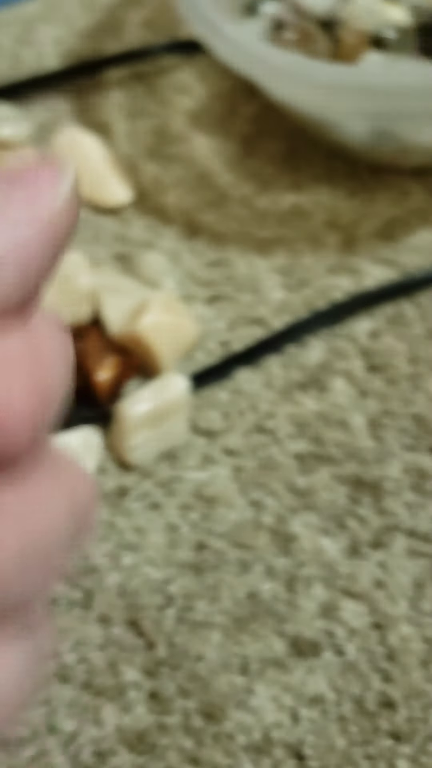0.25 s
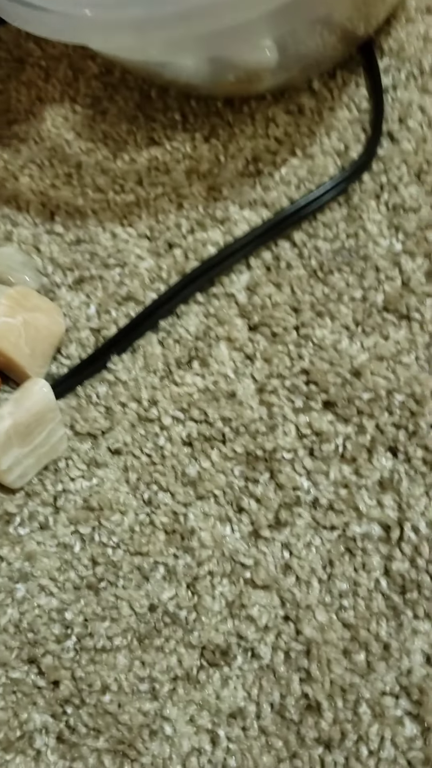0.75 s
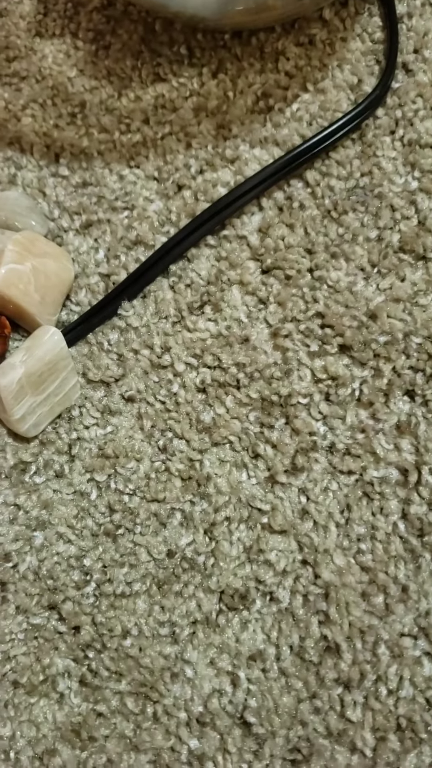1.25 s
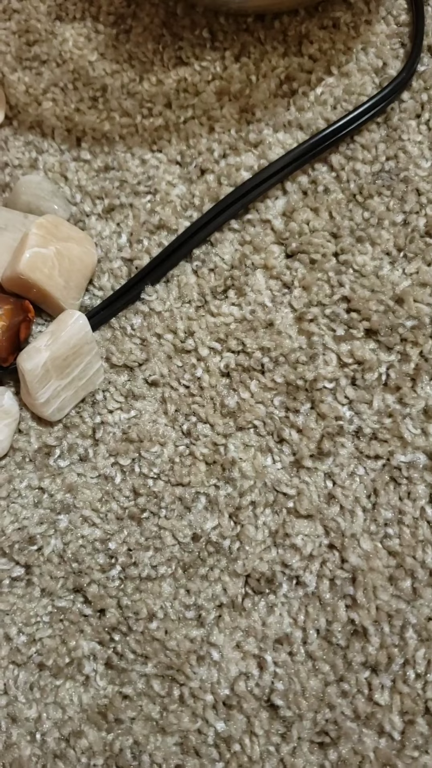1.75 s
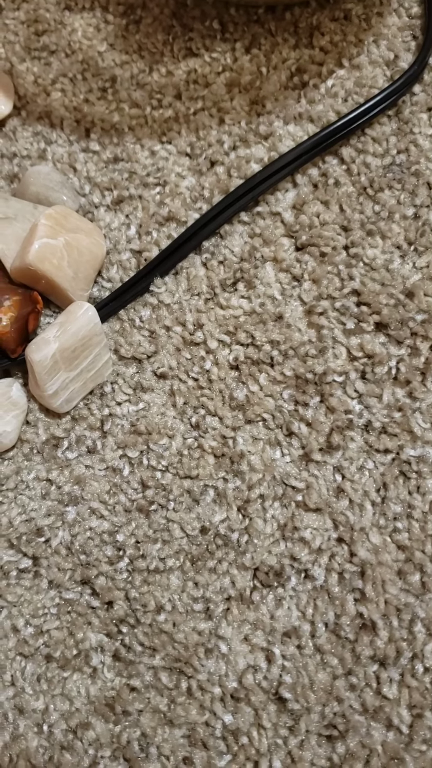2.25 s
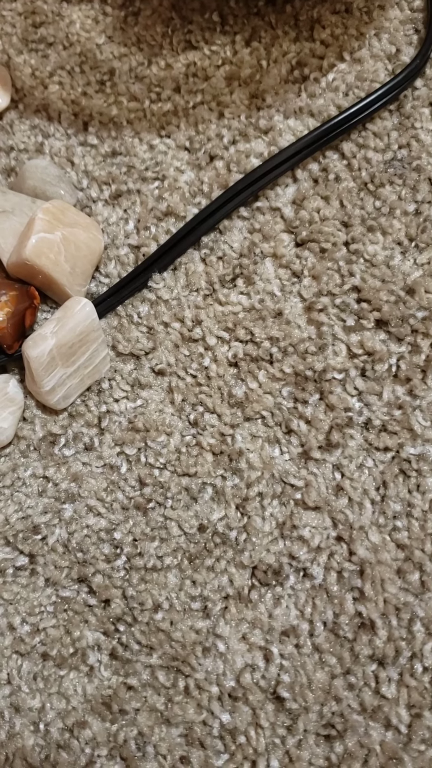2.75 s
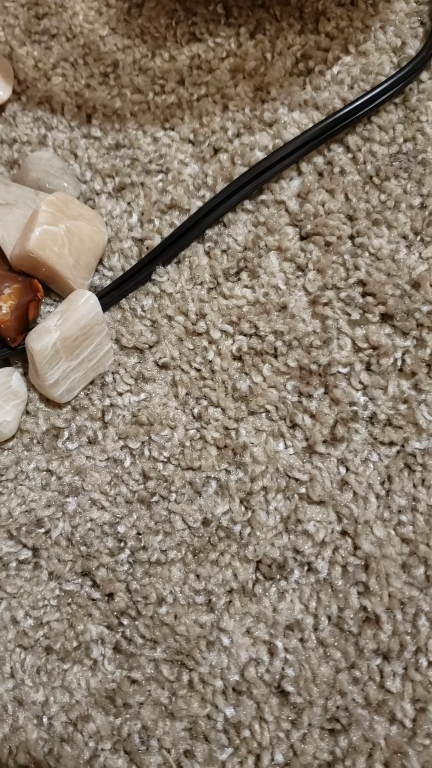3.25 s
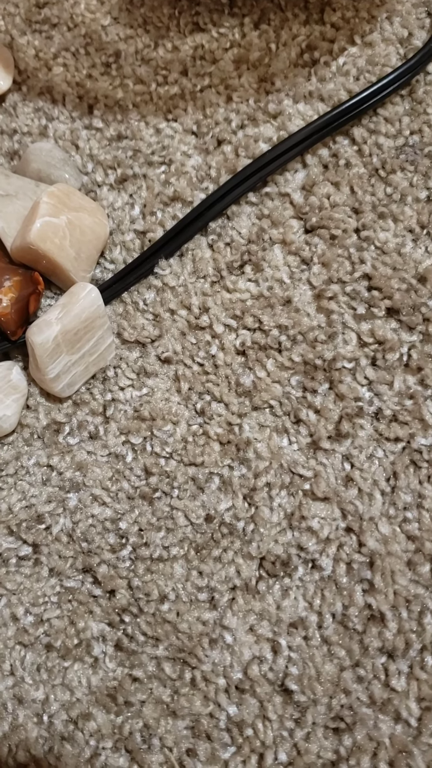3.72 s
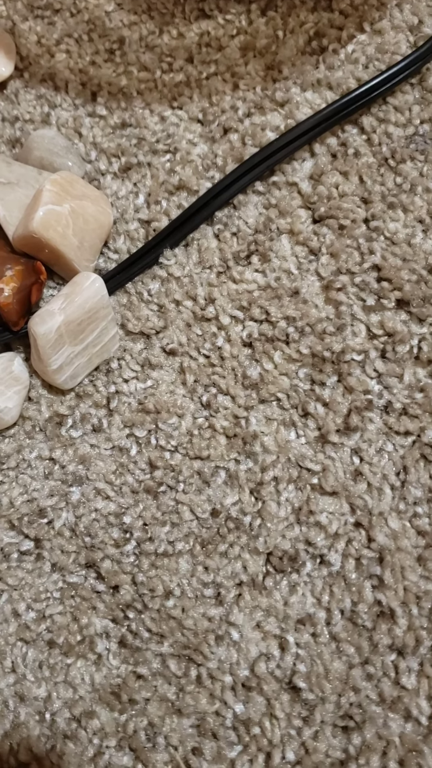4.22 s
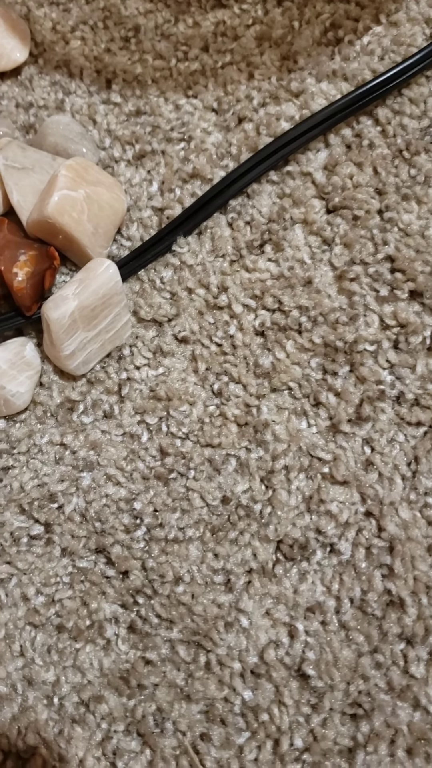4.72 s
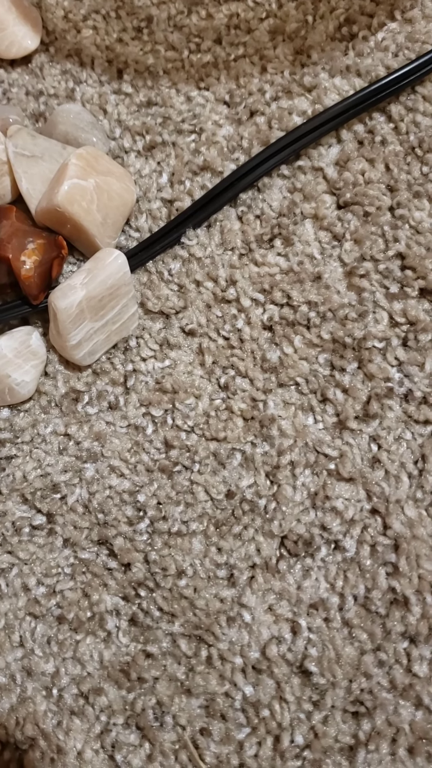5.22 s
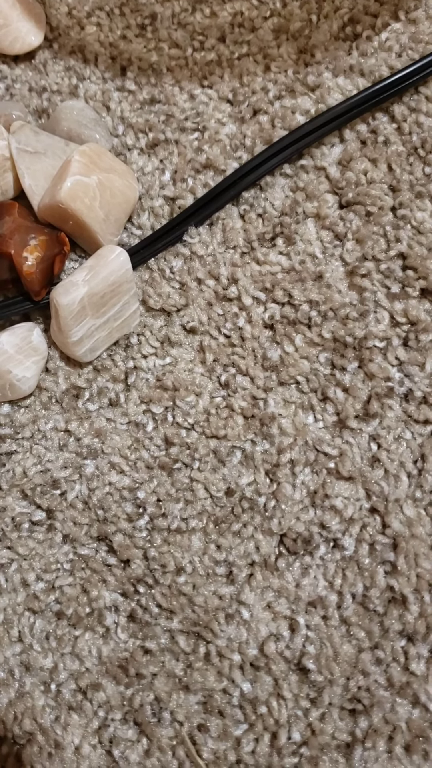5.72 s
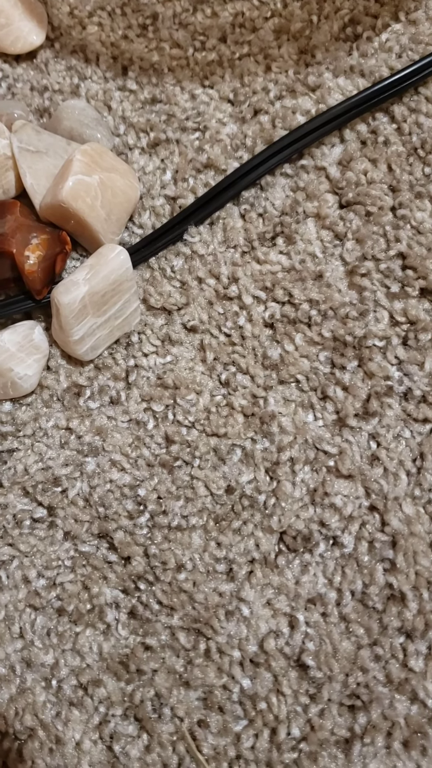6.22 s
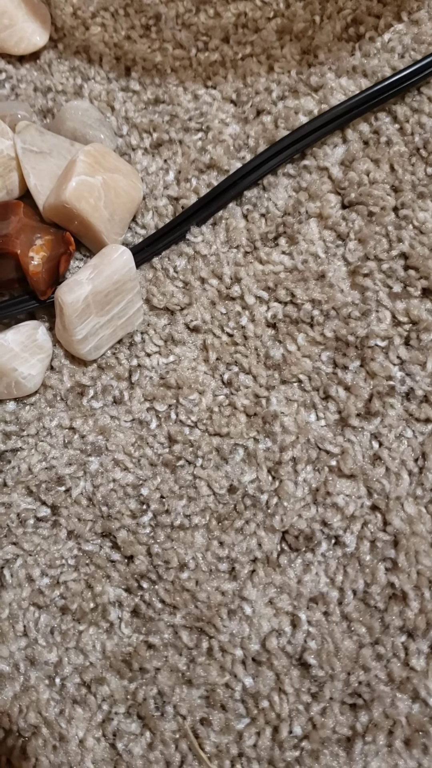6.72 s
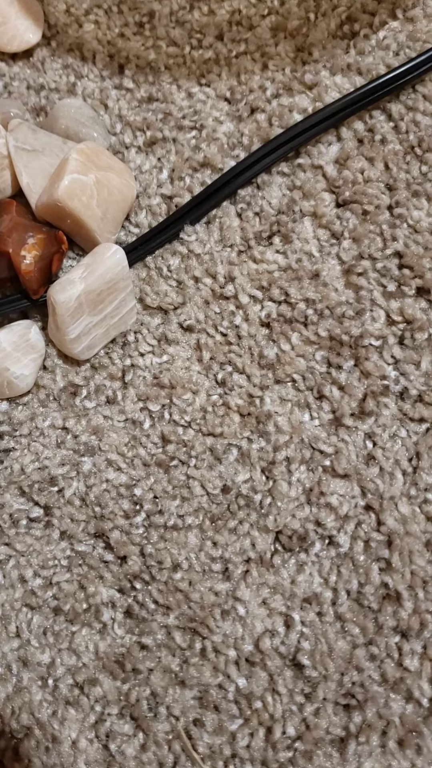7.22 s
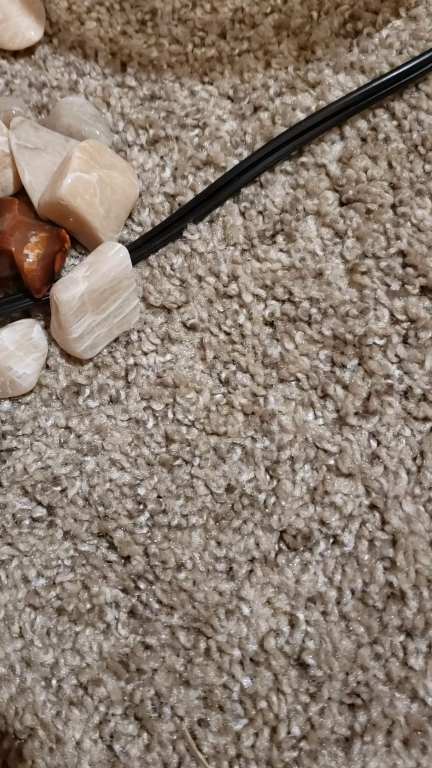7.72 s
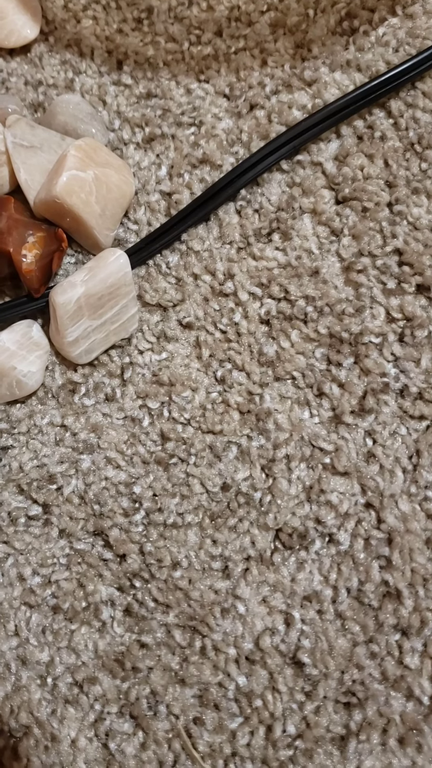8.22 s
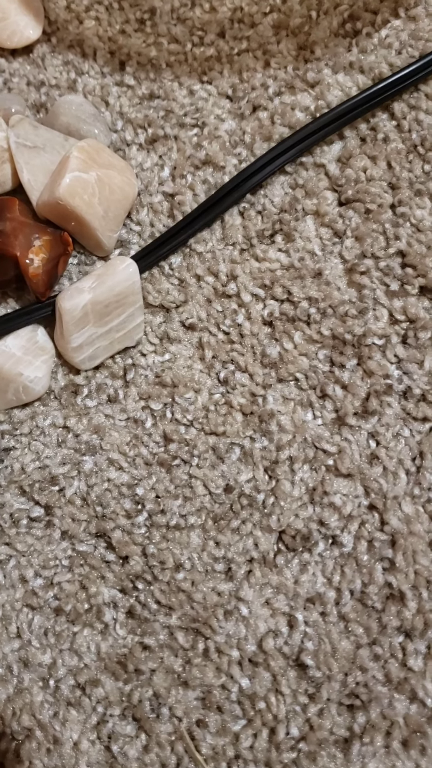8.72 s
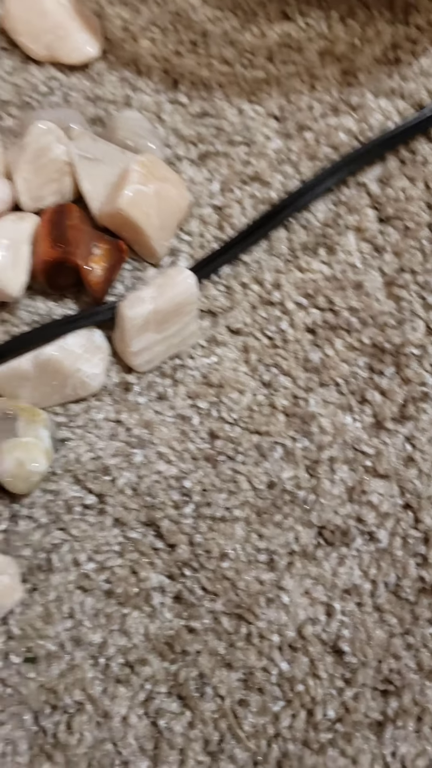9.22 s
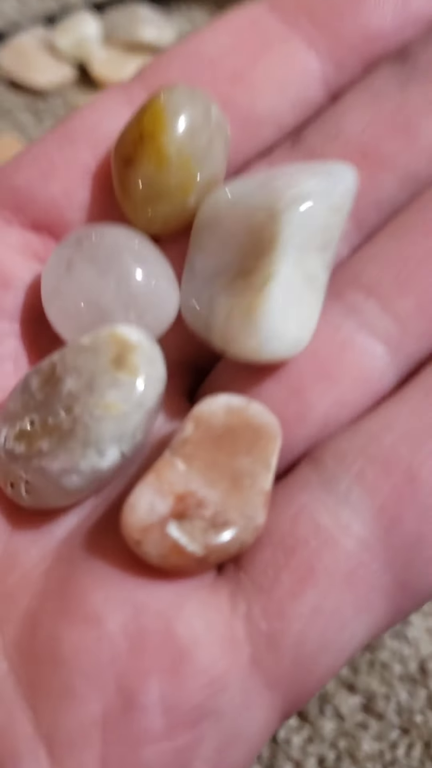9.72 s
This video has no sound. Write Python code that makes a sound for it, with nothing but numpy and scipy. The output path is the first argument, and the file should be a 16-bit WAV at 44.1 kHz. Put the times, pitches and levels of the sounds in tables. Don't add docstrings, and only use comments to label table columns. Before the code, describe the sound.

Close, dry stereo in a small carpeted room. Polished pebbles click in a hand, then pour into a plastic tub in a bright, dense rattle with hollow knocks. A few stragglers tick to rest, with one last tap on the tub. After quiet gaps come sharp clicks, small clattering bursts and very soft presses on carpet as stones are picked up and sorted. A faint, slowly swelling low hum and slight hiss lie underneath.

```python
import sys
import numpy as np
from scipy import signal
from scipy.fft import rfft, irfft
from scipy.io import wavfile
from scipy.ndimage import uniform_filter1d

SR = 44100
rng = np.random.default_rng(int(sys.argv[2]) if len(sys.argv) > 2 else 0)


def waveform_to_disk(signal):
    frames = np.transpose(np.atleast_2d(signal))
    scaled = np.clip(frames, -1, 1) * 32767
    samples = np.round(scaled).astype(np.int16)
    wavfile.write(sys.argv[1], SR, samples)


def ratio(d):
    e = np.asarray(d, float) / 20
    return 10 ** e


N = 439236


def evened(x):
    return x / np.sqrt(np.mean(x ** 2) + 1e-20)


def read(points, hz):
    f, value = np.transpose(points)
    return np.interp(np.log(hz + 1), np.log(f + 1), value)


def add(mix, s, sound):
    part = mix[round(s * SR):][:len(sound)]
    part += sound[:len(part)]


def drift(curve):
    return np.interp(np.arange(N) / SR, *np.transpose(curve))


def colour(x, db):
    hz, t, z = signal.stft(x, SR, nperseg=256)
    z = z * ratio(db(hz[:, None], t))
    return signal.istft(z, SR, nperseg=256)[1][..., :x.shape[-1]]


# pitch_hz, likeness (1 = the same)
LIKENESS = [(60, 0.86), (130, 0.57), (290, 0.94), (640, 0.37), (1400, 0.27), (3000, 0.017)]


def background(tone, patchy_db=2.5):
    frames, hz = N // 1024 + 5, np.fft.rfftfreq(4096, 1 / SR)
    a, b, c, d, patches = rng.standard_normal((frames, 2049, 5)).T
    patches = evened(uniform_filter1d(uniform_filter1d(patches, 6, 0), 4, 1))
    same = np.clip(read(LIKENESS, hz), -1, 1)[:, None]
    left, other = a + 1j * b, c + 1j * d
    z = np.array([left, same * left + np.sqrt(1 - same ** 2) * other])
    z *= ratio(read(tone, hz)[:, None] + patchy_db * patches)
    return evened(signal.istft(z, nperseg=4096, noverlap=3072)[1][:, :N])


# pitch_hz, density_db (per Hz)
HUM_TONE = [(18, -40), (30, -13.5), (48, -9), (64, 2), (87, -14), (118, 5), (133, -11.5), (151, -14),
            (199, -12.5), (243, -2.5), (265, -7.5), (285, -27), (314, -11), (345, -19), (380, -25),
            (490, -59.5), (840, -120)]
# time_s, level_db
HUM_LEVEL = [(0.0, -61), (1, -62.5), (1.41, -68.5), (3.1, -71.5), (4.05, -61), (5.1, -62.5), (5.6, -58),
             (6.46, -62), (8.5, -59.5), (9.96, -62)]


def hum():
    return ratio(drift(HUM_LEVEL)) * background(HUM_TONE)


# pitch_hz, density_db (per Hz)
HISS_TONE = [(220, -27), (380, -8), (546, -13), (726, -8.5), (785, -12), (1430, -17), (3700, -20.5),
             (5800, -24), (6700, -22), (7400, -28), (8800, -29.5), (12200, -18.5), (15850, -19.5),
             (16000, -46)]
# time_s, level_db
HISS_DRIFT = [(0, -79), (1.4, -86.5), (3.3, -91), (4.2, -84), (6.5, -85.5), (8.2, -82.5), (9.96, -84)]


def hiss():
    return ratio(drift(HISS_DRIFT) + 8.5) * background(HISS_TONE)


# pitch_hz, t60_s
SCATTER_T60 = [(300, 0.34), (1300, 0.21), (3500, 0.13), (9000, 0.047), (15000, 0.041)]
# delay_s, level_db
WALL_ECHOES = [
    (.0035, -15),
    (.0115, -19),
    (.019, -22.5),
]


def room(x, scatter_db=-10.5, late_db=-23, late_t60=0.28):
    t = np.arange(SR // 2) / SR
    taps = rng.standard_normal((2, 2, SR // 2)) * np.clip((t - .002) / 0.0014, 0, 1)
    early = colour(taps[0], lambda hz, t: -60 * t / read(SCATTER_T60, hz) - 5 * (t > .036))
    late = taps[1] * ratio(-60 * t / late_t60)
    tail = ratio(scatter_db) * early / np.linalg.norm(early[0])
    tail = tail + ratio(late_db) * late / np.linalg.norm(late[0])
    for s, db in WALL_ECHOES:
        for side in tail:
            add(side, s + 0.00059 * rng.random(), ratio(db) * rng.choice([-1., 1.], size=1))
    return signal.oaconvolve(x[None], tail, axes=1)[:, :N]


# start_s, peak_db
PRESSES = [(1.738, -72), (5.653, -74), (6.413, -70), (7.081, -68.5), (7.931, -61.5), (8.224, -64.5),
           (8.749, -65.5)]


def carpet(low_hz=300, high_hz=520, t60=0.17):
    out, t = np.zeros(N), np.arange(4000) / SR
    for s, peak_db in PRESSES:
        puff = rng.standard_normal(4000) * np.minimum(t / 0.0013, 1)
        add(out, s, ratio(peak_db + 20.5 - 60 * t / t60) * puff)
    out = signal.lfilter(*signal.butter(2, low_hz, "high", fs=SR), out)
    return signal.lfilter(*signal.butter(1, high_hz, fs=SR), out)


# start_s, peak_db
TUB_KNOCKS = [(0.745, -30.5), (0.758, -30), (0.81, -50), (0.831, -33), (0.846, -40.5), (0.872, -37),
              (0.894, -34.5), (0.907, -38.5), (0.93, -31), (0.949, -39), (0.978, -46), (0.999, -30.5),
              (1.012, -28), (1.029, -32), (1.041, -32.5), (1.056, -33.5), (1.071, -25.5), (1.087, -34.5),
              (1.104, -38.5), (1.141, -33.5), (1.158, -33.5), (1.178, -36.5), (1.195, -35), (1.209, -38),
              (1.232, -32), (1.247, -36), (1.275, -37), (1.293, -36.5), (1.309, -43.5), (1.41, -48),
              (2.12, -30), (2.135, -34), (2.175, -43.5)]
# pitch_hz, level_db, t60_s
WALL_RING = [(292, -25.5, 0.0027), (449.6, -19.5, 0.0036), (694, -4.5, 0.039), (747.5, -0.5, 0.033),
             (940, -6, 0.012), (1470, -1, 0.0071), (1860, -8, 0.0053), (2500, -0.5, 0.0087),
             (4030, -3, 0.017)]
# pitch_hz, level_db, t60_s
RIM_RINGING = [(600, -26, .012), (735, 4, 0.025), (920, -1, 0.018), (1314, 0, 0.02), (1690, -13.5, 0.022),
               (2440, -4, 0.011), (3080, -14.5, 0.0083), (4240, -6, 0.0073)]
RIM_FROM_S = 2
TUB_LAG = 24


def tub():
    out, t = np.zeros(N), np.arange(2000) / SR
    for s, peak_db in TUB_KNOCKS:
        if s < RIM_FROM_S:
            modes, scuff_t60, spread, lowest_hz = WALL_RING, .014, .047, 210
        else:
            modes, scuff_t60, spread, lowest_hz = RIM_RINGING, .003, .02, 500
        hz, db, t60 = np.transpose(modes)[:, :, None]
        off_hz, off_db = spread * rng.standard_normal((2, len(modes), 1))
        ring = ratio(db + 64.0 * off_db - 60 * t / t60) * np.sin(2 * np.pi * hz * (1 + off_hz) * t)
        scuff = rng.standard_normal(600) * ratio(-60 * t[:600] / scuff_t60)
        knock = signal.fftconvolve(ring.sum(0), scuff)
        knock = signal.sosfilt(signal.butter(4, lowest_hz, "high", fs=SR, output="sos"), knock)
        add(out, s, ratio(peak_db + 6.0) * knock / abs(knock).max())
    return np.array([out, np.roll(out, TUB_LAG)])


# time_s, level_db, dullness_db (per octave)
POURING = [
    (0.759, -45, 2),
    (.83, -42.5, 6),
    (.92, -37, 7.5),
    (1, -30, 1.5),
    (1.1, -29, 3),
    (1.2, -32.5, 2.5),
    (1.3, -46, 5),
    (1.38, -56, 6.5),
    (1.44, -69.5, 8.5),
]
# start_s, length_s, level_db, dullness_db (per octave)
JOLTED = [(0, 0.024, -48, -1), (1.964, 0.36, -57.5, 0), (3.901, 0.5, -60.5, 3.5), (4.224, 0.1, -54, 1.5),
          (9.133, .25, -56.5, 1.5), (8.547, .15, -63.5, -2), (2.599, .15, -63, 3),
          (6.744, 0.36, -55.5, -0.5), (9.209, 0.13, -48.5, 1), (9.268, .06, -49, 3),
          (9.306, 0.11, -37, -0.5), (9.469, 0.15, -55, 1)]
# middle_s, half_length_s,
# level_db, dullness_db (per octave)
SWELLING = [(0.295, 0.083, -65, 5.5), (0.398, 0.052, -69, -17.5), (1.588, 0.12, -48, -1),
            (1.745, 0.068, -48.5, 3.5), (5.629, 0.074, -75.5, 2.5), (5.766, 0.082, -79, 8.5),
            (6.423, 0.2, -85.5, 11.5), (6.724, 0.046, -80, -13.5), (7.971, 0.056, -53.5, 5),
            (8.152, 0.038, -58, 5), (8.258, .06, -54, 3), (8.79, 0.068, -58, 3.5)]
# start_s, end_s, level_db, dullness_db (per octave)
ROLLED = [(.495, .506, -40, -5.5), (0.565, .577, -45, -3), (0.577, .605, -46.5, -3.5),
          (0.656, .672, -47.5, -1), (.687, .697, -46, -2), (0.925, .94, -33.5, -0.5),
          (3.867, 3.905, -53, 1.5), (4, 4.045, -49.5, -1.5), (4.154, 4.16, -48.5, 1),
          (4.186, 4.225, -41, 1), (4.309, 4.34, -53.5, -2), (7.602, 7.644, -42.5, 0),
          (7.081, 7.095, -55, 9), (8.524, 8.545, -50.5, 1), (8.731, 8.8, -48, 2.5)]
REST_DB, STIR_EDGE_DB = -26.5, -13.5
ROLL_LOW_HZ = 3350


def motion_db(hz, t):
    octaves = np.log2(np.maximum(hz, 1000) / 8000)

    s, level_db, dull_db = np.transpose(POURING)
    pour = ratio(np.interp(t, s, level_db, -130, -130) - octaves * np.interp(t, s, dull_db))

    start, length, level_db, dull_db = np.transpose(JOLTED)[:, :, None]
    dying = (t >= start) * ratio(level_db + REST_DB * abs(t - start) / length)
    jolts = ratio(-octaves * dull_db.T) @ dying

    middle, half, level_db, dull_db = np.transpose(SWELLING)[:, :, None]
    arch = ratio(level_db + STIR_EDGE_DB * ((t - middle) / half) ** 2)
    stirs = ratio(-octaves * dull_db.T) @ arch

    start, end, level_db, dull_db = np.transpose(ROLLED)[:, :, None]
    steady = (t >= start) * (t < end) * ratio(level_db)
    rolls = ratio(-octaves * dull_db.T) @ steady / (1 + (ROLL_LOW_HZ / (hz + 1)) ** 6)
    return 20 * np.log10(pour + jolts + stirs + rolls)


# pitch_hz, density_db (per Hz)
CONTACT_TONE = [(590, -42.5), (1000, -18.5), (1740, -7), (2300, -9.5), (2590, -6.5), (15200, 4.5),
                (15900, 7.5), (16500, -21.5)]
GRITTY_DB = -60.5


def rattle(per_s=2400, size_db=1.5):
    size = ratio(size_db * np.minimum(rng.exponential(1, N), 5))
    grit = size * (rng.random(N) < per_s / SR)
    grit = evened(uniform_filter1d(grit, size=28))
    force_db = motion_db(6000, np.arange(0, N, 64) / SR)[0].repeat(64)[:N]
    share = 1 / (1 + ratio(2 * (GRITTY_DB - force_db)))
    rub = (np.sqrt(share) * grit + 1 - share) * rng.standard_normal((2, N))
    rub = evened(colour(rub, lambda hz, t: read(CONTACT_TONE, hz)))
    return colour(rub, motion_db)


CLICK_HZ = [1300, 2100, 3300, 4900, 6800, 12000]
CLICK_T60 = [
    [.007],
    [.0028],
]
LEAD_IN = 128


def click(strength_db, tick_db, middle_db, low_db, luck, stretch, gain_db=24, split_hz=5500):
    t = np.arange(896) / SR / stretch
    rise = np.minimum(t / .0004, 1)
    bursts = ratio(-60 * t / CLICK_T60)[:, None] * rise * luck
    bursts = bursts / np.linalg.norm(bursts, axis=2, keepdims=True)
    spectra = rfft(np.pad(bursts, ((0, 0), (0, 0), (LEAD_IN, 0))))
    slow, quick = (v / np.sqrt(abs(uniform_filter1d(abs(v) ** 2, size=60)) + 1e-9) for v in spectra)
    hz = np.fft.rfftfreq(1024, 1 / SR)
    levels_db = [low_db - 31.0, low_db - 2.5, low_db, middle_db, 0, tick_db]
    tone = ratio(gain_db + strength_db + read(np.transpose([CLICK_HZ, levels_db]), hz))
    treble = 1 / (1 + (split_hz / (hz + 1)) ** 4)
    return irfft(((1 - treble) * slow + treble * quick) * tone)


# start_s, strength_db, then against it tick_db, middle_db, low_db
IN_HAND = [(0.0277, -26, -4, -12, -41.5), (0.033, -38.5, -2.5, -9, -19), (0.0385, -37, 5, -6, -16),
           (0.0488, -32, 15.5, -5, -12.5), (0.052, -35.5, 11.5, -8, -25), (0.054, -41, 8.5, -6, -25),
           (0.0841, -28.5, -2, -1.5, -9.5), (0.087, -27, 4.5, -7, -6), (0.0905, -25.5, -6, -4, -59),
           (0.4153, -32, -1.5, 3.5, -8), (0.4506, -31, 11, -9.5, -12.5), (0.4553, -33.5, 3.5, -5, 4.5),
           (0.464, -30.5, 14.5, 5.5, -8), (0.469, -33.5, 7.5, -1, -9), (0.4768, -37.5, 1, -7, -0.5),
           (0.4955, -34, 7, -5, -6), (0.578, -33, 12.5, -15.5, -2.5), (0.5863, -33.5, 1, -7.5, -21.5),
           (0.6564, -34, 2.5, -16, -14), (0.4604, -36, 9.5, -5, -15.5)]
INTO_TUB = [(0.7476, -29, 6, -4, -6.5), (0.7582, -28.5, 4, -1.5, -10.5), (0.804, -46, 13, -2, -1.5),
            (0.8158, -40, 10, -6, -0.5), (0.8309, -31, 14, -7, -2), (0.8496, -25.5, 11, -1, -1),
            (0.8736, -23.5, 5.5, -9, -13), (0.9081, -37.5, 13.5, 5, -1), (0.928, -22.5, 7.5, -2, -2),
            (0.94, -33, 7.5, -5, -4), (0.9516, -31, 2.5, -3.5, -3.5), (0.971, -29.5, 3.5, -8.5, -8.5),
            (0.9826, -31.5, 8.5, -4, -9.5), (0.9999, -28.5, 9, 1.5, 4), (1.0131, -25.5, 7, -2, -4.5),
            (1.0312, -29, 7.5, 2, 4), (1.0407, -28, 10.5, 2, -6), (1.0626, -32, 15.5, 1, 2.5),
            (1.0695, -27.5, 11, -0.5, 3), (1.087, -26.5, 7, -3.5, -5), (1.1066, -31.5, 16.5, -6.5, -6.5),
            (1.1394, -29.5, 11, -5.5, -2), (1.1596, -31, 10.5, 0.5, 0.5), (1.181, -31, 10, -3.5, -5),
            (1.218, -36.5, 18, 0.5, 3.5), (1.2403, -40.5, 11.5, -3, 4), (1.2478, -32, 2.5, 0, -0.5),
            (1.2607, -33, 2.5, -2, -18), (1.2761, -36.5, -2, -17, 1.5), (1.296, -32.5, 11, 2.5, 0.5),
            (1.3401, -38.5, 9, -3.5, 2), (1.346, -36.5, 7, 0, -4.5), (1.3982, -44, 0, -1, 0)]
TO_REST = [(1.4723, -44.5, -4, -2, -4), (1.4937, -38.5, 6, 1, -8), (1.533, -40.5, 0, 6.5, -10),
           (1.5428, -44.5, 14, -5, -10), (1.546, -45, 17.5, 1, -4), (1.616, -45, 9, 5, -1),
           (1.6467, -42, -12, -14, -17), (1.658, -38, 1, -6, -8), (1.6996, -46, -1.5, 5, -2),
           (1.7215, -33.5, -0.5, -4, -18), (1.7323, -42, 1.5, -4, -7), (1.7487, -49, -15, -4, -9),
           (1.758, -35.5, -10.5, 0, -14), (1.7774, -46, -18, 2, -15), (1.8517, -51, 10, 6, 7),
           (1.8841, -47.5, -14, -1, -9), (1.9828, -46, 10, -10, -26), (1.9928, -50, 7, 3, -22),
           (2.01, -48, -3, -4, -18), (2.1221, -42, 6.5, 7.5, 10), (2.176, -57, -5, -4, -13.5),
           (2.22, -58, -5, -2, -8), (2.135, -69, 4, 20, 9), (2.209, -57, -1, -4, -8),
           (2.217, -57.5, 0, -8, 2), (2.3079, -61.5, -5, -13, -22), (2.4275, -53.5, 4.5, -1, -4),
           (2.4757, -54, -0.5, 0, -5.5), (2.497, -57.5, -1, -1, -6), (2.5986, -52, -20, 1, -16),
           (2.6109, -49.5, -16.5, 3, -12), (2.8176, -62, 8, -9, -21), (2.9183, -61, 11, 5, -14),
           (2.931, -56, 0.5, 4.5, -7)]
PICKED_UP = [(3.4417, -65.5, 11, -2, -11.5), (3.6082, -46, 10.5, 4.5, -18.5),
             (3.6142, -47, 7.5, -2.5, -12.5), (3.6353, -48, -4, -4, -13), (3.8653, -56, -3, -1, -16),
             (3.875, -49.5, 0.5, 7, -17), (3.902, -46.5, -1.5, 5, -2), (3.927, -41.5, -9, 0, -5),
             (3.9997, -50, 15, -2, -2), (4.0133, -43.5, 5, -3, -22), (4.1086, -45.5, -7.5, -6, -20),
             (4.132, -51, -11, -1, -19), (4.1673, -25, 1.5, -3.5, -32), (4.1769, -30.5, 2, -4.5, -20.5),
             (4.2323, -44, -8, 2, -7), (4.311, -48, 11.5, -9, -25), (4.3173, -51.5, 8, 3.5, -22),
             (5.5953, -62, 13, -7, -2)]
ON_CARPET = [(6.7407, -36.5, 13.5, -1.5, -17), (6.7556, -40, 11, 3, -19), (6.7653, -41, 2, 2, -26.5),
             (6.827, -46, -12, 0, -24), (6.8357, -44.5, 7, 5, -5.5), (6.8832, -62, 1.5, 3, 3),
             (6.983, -48, -3.5, -12, -9), (6.9879, -50.5, 2.5, -1, -17), (7.0666, -49.5, -19, 3, 1),
             (7.0791, -52, -18, -1, 8), (7.536, -39.5, -6, -21, -9), (7.5544, -36.5, 3.5, 15, 1.5),
             (7.556, -37.5, 8.5, -4.5, -0.5), (7.5985, -27.5, 4, -7, -7), (6.975, -63, 8, -5, -20),
             (6.938, -58.5, -5, -6, -20), (7.6191, -38, 8.5, 9.5, -0.5), (7.6892, -50, 3, 8, -18),
             (7.7525, -49, 2.5, 8.5, -4), (7.9178, -38, 2.5, -4.5, 4.5), (7.9282, -44, 7.5, 5.5, -12),
             (7.119, -60, -3, -5, -18), (7.965, -34, 0.5, -3, -10), (7.9772, -42.5, -2, -5, -7.5),
             (7.9909, -45, -9, -6, -1), (7.9982, -37.5, 14, -2, -5), (8.0085, -46.5, 5, 5, 4.5),
             (8.1267, -32.5, -8.5, -8.5, -12.5), (8.1428, -30, -9, -12.5, -13.5),
             (8.1545, -35.5, -7, -9, -9), (8.1658, -30.5, 3.5, 2, -8), (8.1764, -38, -9.5, -12, -11),
             (8.179, -39, -3, 5, -16), (8.205, -30, -12, -3, -6.5), (8.2163, -28, -4.5, -3, -9.5),
             (8.2251, -32.5, -14.5, -5, -13), (8.2316, -35, -8, 5.5, -6)]
LIFTED_AGAIN = [(8.5116, -44, 2, -2, -21), (8.5202, -44.5, 4.5, 4, -15), (8.6996, -47.5, -24, 1, -7),
                (8.716, -48.5, -13, 4, 1.5), (8.7476, -35.5, -1.5, 2.5, -1), (8.392, -64.5, -20, -4, -18),
                (8.498, -70, -18, -5, -20), (8.7897, -45, 5, -4, -9), (8.7937, -51.5, -2.5, 4, -6),
                (9.061, -60.5, -17, 4, -7), (9.0988, -60, -21, -1.5, -18),
                (9.1303, -21.5, -16.5, -5.5, -10.5), (9.1333, -40, -10.5, 12, 12),
                (9.1363, -34, -11, -15, -14), (9.1452, -44, -13, -12, -15), (9.214, -34.5, 4.5, 11.5, -5.5),
                (9.2208, -36.5, -3, -2, -14), (9.2695, -50.5, 18.5, -1, -6), (9.2775, -46, 7, -2, -11),
                (9.2814, -45, 8.5, 6, 1), (9.3068, -33.5, 5, 2, 3), (9.3219, -44.5, 3, -2, -9),
                (9.3344, -24, -15, -2.5, -15), (9.3457, -40, -1.5, -4, -19), (9.3545, -37, -7.5, 3, -17),
                (9.359, -35, -5, -2, -12), (9.4678, -39, -16, -5, -22.5), (9.4768, -39, 1.5, -2, -18),
                (9.4943, -42, 7, 1, -10.5), (9.5073, -49.5, 10.5, 1, 1), (9.5119, -43.5, 5, 1, -6),
                (9.5787, -58.5, -3.5, -5, -16), (9.647, -57, -21, -8, -27)]
# time_s, lag at the far port (samples)
HAND_LAG = [(0, 18), (1.4, 18), (2.3, 11), (3.6, 11), (4.2, 9), (6.5, 3), (7.7, 7), (9.96, 3)]
REBOUND_S, REBOUND_DB = 0.015, -8
SKID_DB, SKID_STRETCH = -8.5, 4.0


def stones():
    out, lag = np.zeros((2, N)), drift(HAND_LAG)
    for s, strength_db, *tone_db in IN_HAND + INTO_TUB + TO_REST + PICKED_UP + ON_CARPET + LIFTED_AGAIN:
        later, weaker = rng.random(2)
        strike = s, strength_db, 1
        rebound = s + later * REBOUND_S, strength_db + REBOUND_DB * (1 + weaker), 1
        skid = s, strength_db + SKID_DB, SKID_STRETCH
        for at, db, stretch in (strike, rebound, skid):
            a, b = rng.standard_normal((2, 896))
            near, far = click(db, *tone_db, np.array([a, 0.27 * a + 1.8 * b]), stretch)
            add(out[0], at - LEAD_IN / SR, near)
            add(out[1], at + (lag[round(s * SR)] - LEAD_IN) / SR, far)
    return out


# pitch_hz, level_db
PORT_TONE = [(1000, -2.5), (5200, 5), (6000, 6), (6700, 9.5), (7500, 4.5), (9000, 2), (12300, 5.5),
             (15800, -1), (16050, -29)]
# pitch_hz, share
SHADE_SHARE = [(300, .05), (1300, .3), (2400, .3), (4400, .75), (8000, 1), (15000, 1.12)]


def ports(x):
    def response_db(hz, t):
        shade_db = 3 + .5 * np.interp(t, *np.transpose(HAND_LAG))
        return read(PORT_TONE, hz) - np.multiply.outer([0, 1], read(SHADE_SHARE, hz) * shade_db)
    return colour(x, response_db)


def scene():
    hand = carpet() + tub() + rattle() + stones()
    return hum() + hiss() + ports(hand + room(hand[0]))


def band_limit(x):
    return signal.sosfilt(signal.butter(12, 17150, fs=SR, output="sos"), x)


def record(dry, bass_hz=45):
    rounded = np.tanh(dry)
    cut = signal.lfilter(*signal.butter(2, bass_hz, "high", fs=SR), rounded)
    return band_limit(cut)


dry = scene()
out = record(dry)
waveform_to_disk(out)
```